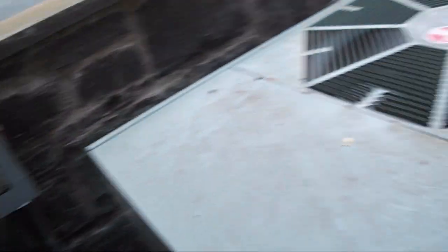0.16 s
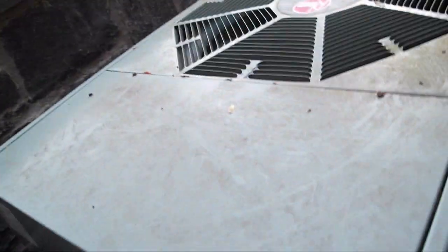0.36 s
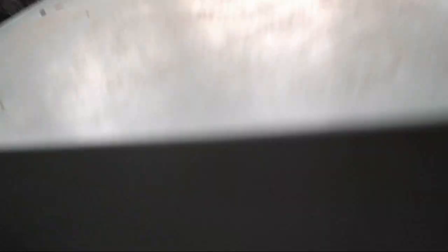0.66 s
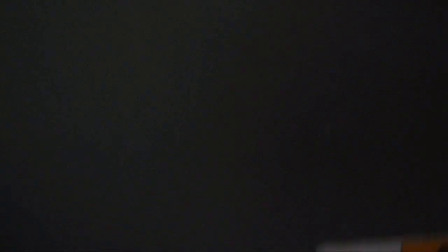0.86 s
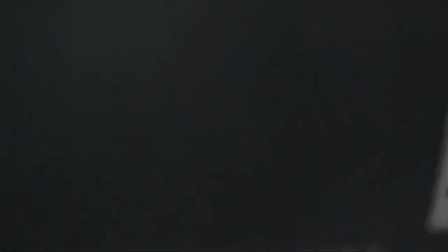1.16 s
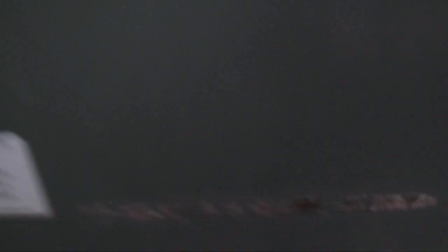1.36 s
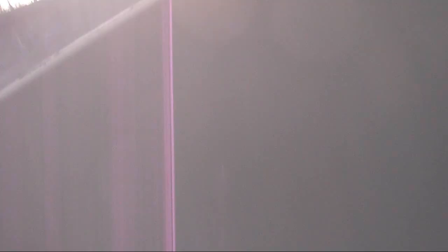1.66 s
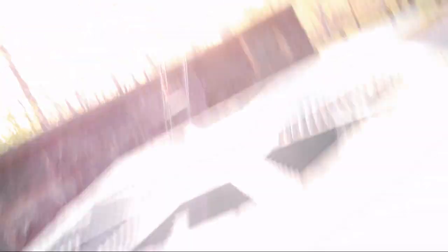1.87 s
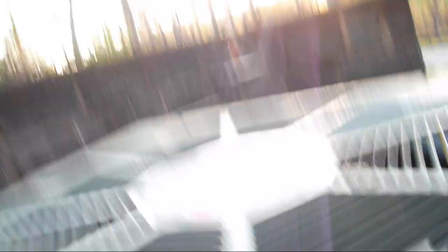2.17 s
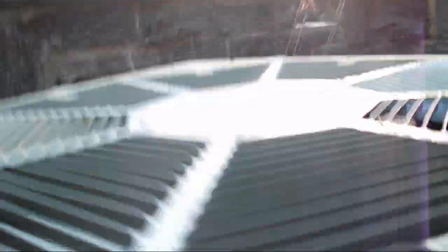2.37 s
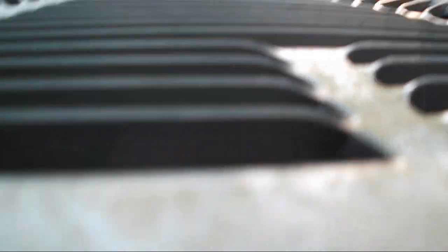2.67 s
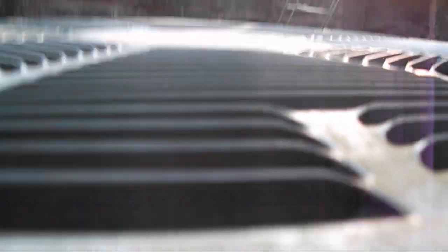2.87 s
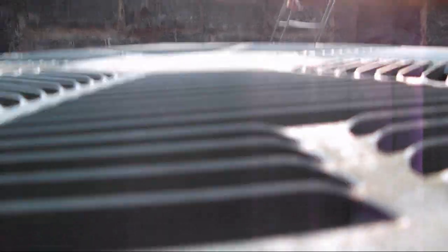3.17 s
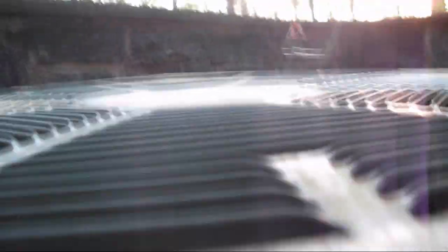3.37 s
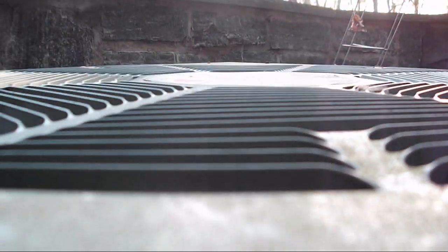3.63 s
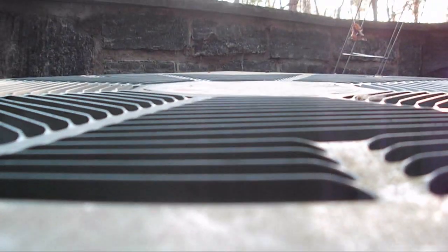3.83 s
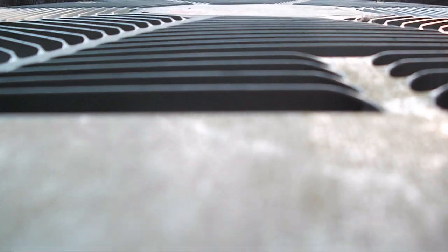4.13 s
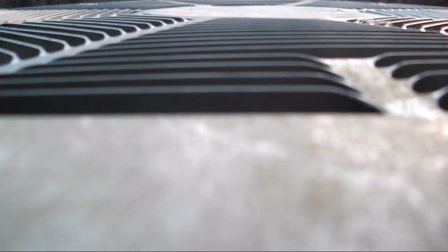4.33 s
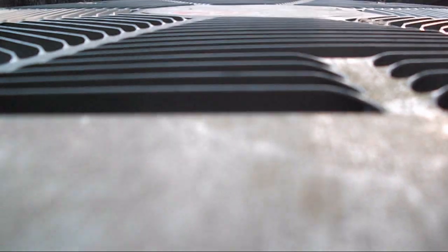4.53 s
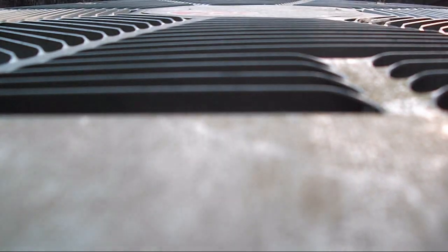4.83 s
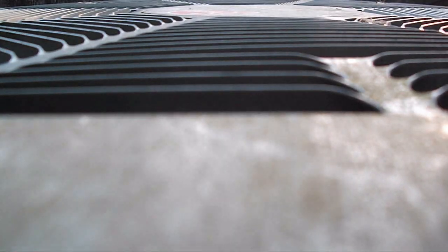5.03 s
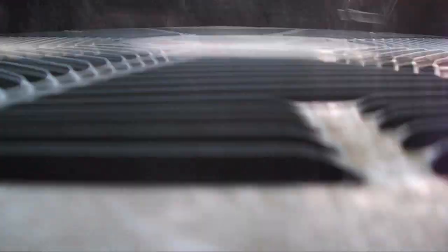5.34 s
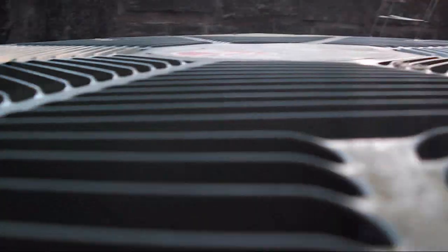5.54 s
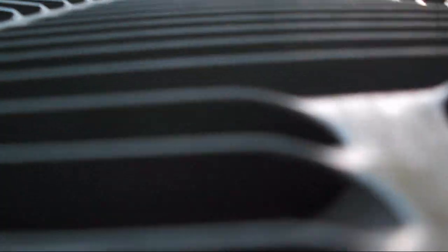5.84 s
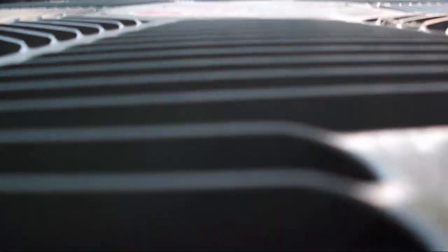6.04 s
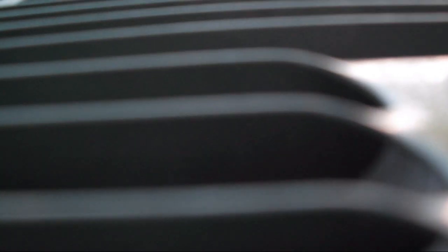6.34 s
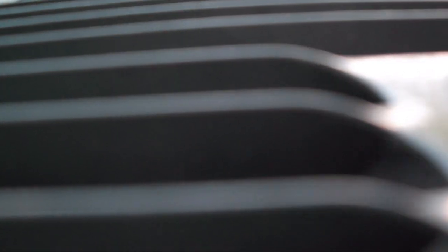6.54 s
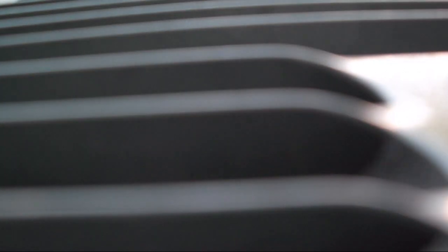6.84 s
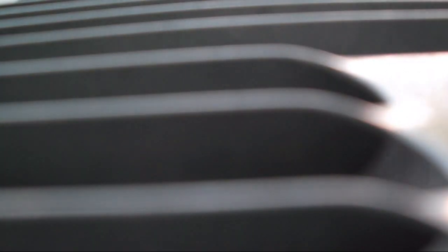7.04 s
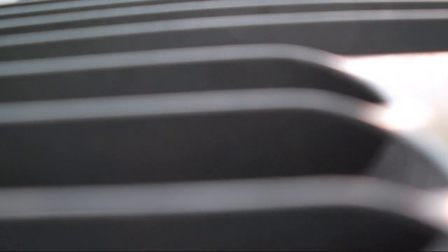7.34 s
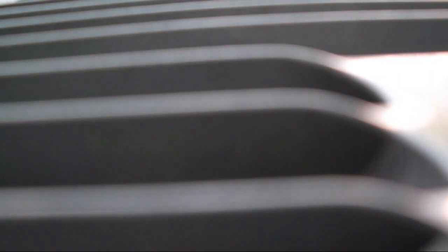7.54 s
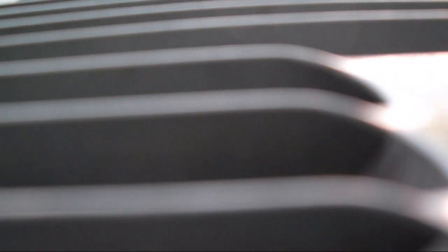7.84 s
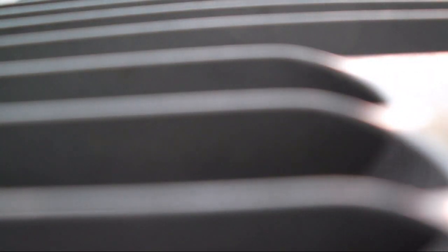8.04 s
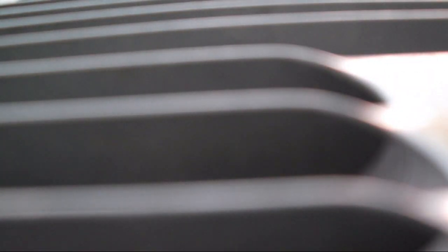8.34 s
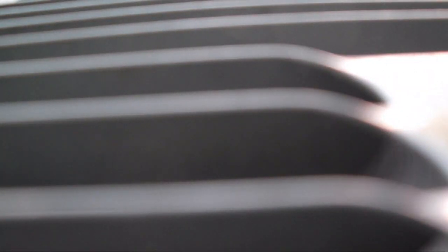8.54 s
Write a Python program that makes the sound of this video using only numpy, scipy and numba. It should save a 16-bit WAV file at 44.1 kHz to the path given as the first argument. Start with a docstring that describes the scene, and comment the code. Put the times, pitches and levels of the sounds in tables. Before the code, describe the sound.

A handheld microphone moves around a running heat pump outdoors. At first there is steady airy hiss and low hum, then a close buzzing panel drone with small dry creaks. Over the fan, a deep rapid throb and wind rumble take over. Sharp plastic-on-metal knocks cluster, a few fainter ones follow, then a scrape and thump, before a long, loud, slightly clipped rumble.

```python
"""An outdoor heat pump runs: a three-bladed fan throbs and drives air through coil and top grille; the compressor
hums and whines. Pulses and air are blade harmonics and coloured noise; hum and whine are shaft harmonics.
A hand-held camera creaks as enveloped noise, passes the cabinet's side and is rested on the lid,
where it knocks as struck ringing modes, scrapes as swelling noise, and catches the draught.
Its stepped gain control ducks just after loud crests, then climbs back in small steps."""
import sys
import numpy as np
from scipy import signal
from scipy.fft import rfft, irfft, next_fast_len
from scipy.io import wavfile
from numba import njit

SR = 44100
rng = np.random.default_rng(int(sys.argv[2]) if len(sys.argv) > 2 else 0)


def file_out(sig):
    """Save sig as 16-bit WAV at sys.argv[1]."""
    # one column per channel
    cols = np.atleast_2d(sig).T
    # limit, then scale
    lim = np.clip(cols, -1, 1)
    pcm = np.round(lim * 32767).astype(np.int16)
    wavfile.write(sys.argv[1], SR, pcm)


N = 383669
TIME = np.arange(N) / SR  # s


def undb(db):
    """Decibels to gain."""
    return 10 ** (np.asarray(db) / 20)


def unit(x):
    """Scale to rms 1."""
    return x / np.sqrt(np.mean(x ** 2))


def curves(table):
    """Each column of a timed table, joined by straight lines."""
    s, *columns = np.transpose(table)
    return [np.interp(TIME, s, column) for column in columns]


def walk(rate_hz):
    """Smooth random wander of rms 1: noise with a Gaussian low-pass, empty above 200 Hz."""
    f = np.fft.rfftfreq(2 ** 19, 1 / SR)
    bins = np.count_nonzero(f < 200)
    spectrum = rng.standard_normal(bins) + 1j * rng.standard_normal(bins)
    wander = irfft(spectrum * np.exp(-(f[:bins] / rate_hz) ** 2))
    wander_time = np.arange(len(wander)) / len(wander) / f[1]
    return unit(np.interp(TIME, wander_time, wander))


def noise(spectrum, rings=()):
    """Noise of rms 1, coloured by an f/Hz, level/dB curve and optional narrow resonances."""
    hz, db = np.transpose(spectrum)
    size = next_fast_len(N)
    f = np.maximum(np.fft.rfftfreq(size, 1 / SR), 1)
    colour_db = np.interp(np.log(f), np.log(hz), db)
    for centre, width, lift in rings:
        colour_db = colour_db + lift / (1 + (2 * (f - centre) / width) ** 2)
    white = rng.standard_normal(size)
    return unit(irfft(rfft(white) * undb(colour_db), size)[:N])


def add(out, s, sound):
    """Mix a sound in at time s."""
    i = int(s * SR)
    out[i:i + len(sound)] += sound[:N - i]


BLADE_HZ, BLADE_COUNT = 42.63, 3
# Blade pulse: multiple of the blade rate, level/dB against the throb; the first row is the throb itself
BLADE_HARMONICS = [(1, 0), (2, -16), (3, -20), (4, -28), (5, -32), (6, -39), (7, -32.5), (8, -32.5)]


def fan(angle, throb_db, unbalance_db=-18, flutter_db=2.0, overtone_flutter_db=3, far_db=-34, skew=0.99):
    """Each blade sweeps a lopsided pressure pulse past the microphone; one blade pushes a little harder."""
    pulse = np.cos(angle) + undb(unbalance_db) * np.cos(angle / BLADE_COUNT)
    for order, db in BLADE_HARMONICS[1:]:
        level = undb(db + overtone_flutter_db * walk(4.7))
        pulse = pulse + level * np.cos(order * angle + skew)  # skew in radians
    near = undb(throb_db + flutter_db * walk(9)) * pulse
    # the third and fifth harmonics also carry all round the cabinet
    carried = np.cos(3 * angle + skew) + np.cos(5 * angle + skew)
    return np.sqrt(2) * (near + undb(far_db) * carried)


# Buffeting outgrows the throb: level at the louvres, dB per dB of nearness, level in the open air
BUFFET_DB, BUFFET_SLOPE, BREEZE_DB = -9, 2.0, -28.5
# The rush levels off inside the fan's jet: level there, nearness at the jet's edge
RUSH_DB, JET_EDGE_DB = -21.5, -14
# The draught hits the microphone squarely: t/s, half length/s, lift/dB
SQUARE_GUSTS = [(3.35, 0.1373, 6), (6.267, 0.27, 3.5)]


def draught(near_db, rush_share=0.71):
    """Levels in dB of buffeting and rush, from the nearness to the fan and the gusts."""
    gust_db = sum(db * np.exp(-((TIME - s) / half_s) ** 2) for s, half_s, db in SQUARE_GUSTS)
    buffet = np.hypot(undb(BUFFET_DB + BUFFET_SLOPE * near_db), undb(BREEZE_DB))
    rush = undb(RUSH_DB) / np.hypot(1, undb(JET_EDGE_DB - near_db))
    buffet_db = 20 * np.log10(buffet) + gust_db
    rush_db = 20 * np.log10(rush) + rush_share * gust_db
    return buffet_db, rush_db


# Colour of air through the coil: f/Hz, relative level/dB per Hz
COIL_COLOUR = [(25, 3.5), (100, -4), (200, -0.5), (380, -8.5), (560, -11), (950, -11.5), (1700, -17),
               (2450, -19), (3300, -31.5), (4200, -34.5), (5400, -32), (7000, -33), (8300, -40.5),
               (11400, -40.5), (13500, -54.5)]
# Narrow resonances in the coil's hiss: f/Hz, width/Hz, lift/dB
COIL_RESONANCES = [(1490, 74, -0.5), (2300, 360, 1), (5190, 100, 5.5), (6300, 120, 3), (7220, 92, -6),
                   (7900, 150, 2.5), (9570, 220, 3.5)]
# Colour of air past the louvres: f/Hz, relative level/dB per Hz
LOUVRE_COLOUR = [(60, -2), (150, -2), (280, -2), (420, -2.5), (560, -0.5), (720, -8), (1050, -10),
                 (1400, -17.5), (2200, -15), (3400, -28.5), (7000, -73), (11500, -76), (15000, -64)]
# Colour of eddies on the microphone: f/Hz, relative level/dB per Hz
EDDY_COLOUR = [(8, -11), (18, 0.5), (35, -0.5), (80, 0.5), (115, -8.5), (170, -11), (300, -28), (700, -36),
               (2000, -99)]


def air(angle, buffet_db, rush_db, coil_db=-24.5, chop_db=1.5, gust_db=1.6, swirl_db=1.1):
    """Steady air hisses through the coil; above the grille, gusty air rushes in wakes, once a blade."""
    wake, gust = np.cos(angle), walk(29)
    coil = noise(COIL_COLOUR, COIL_RESONANCES) * undb(coil_db + .5 * walk(2.2))
    rush = noise(LOUVRE_COLOUR) * undb(rush_db + chop_db * wake + swirl_db * gust)
    buffet = noise(EDDY_COLOUR) * undb(buffet_db + gust_db * gust)
    return coil + rush + buffet


PASS_S = 1.455  # when the microphone is closest to the compressor's side panel


def pass_by(close_db, half_s, far_db):
    """Gain of a part the microphone passes: it falls as 1 / distance down to what is heard all round."""
    distance = np.hypot(1, (TIME - PASS_S) / half_s)
    return np.hypot(undb(close_db) / distance, undb(far_db))


def tones(angle, table, fade_db):
    """Shaft harmonics in random phase; each level wanders slowly, as if crossing standing waves."""
    out = np.zeros(N)
    for order, db in table:
        phase = 2 * np.pi * rng.random()
        out += undb(db + fade_db * walk(0.56)) * np.sin(order * angle + phase)
    return out


COMPRESSOR_HZ, MAINS_HZ, WHINE_ORDER = 58.63, 60, 19
# Tones heard all round the cabinet: multiple of the shaft rate, level/dB
HUM_TONES = [(8, -40), (9, -39), (10, -44), (14, -42.5), (16, -47.5), (18, -43), (21, -50), (24, -49.5),
             (25, -46.5), (26, -48), (32, -51), (37, -53)]
# Tones of the side panel, heard close to it: multiple of the shaft rate, level/dB before the pass-by gain
PANEL_TONES = [(4, -31), (5, -36), (6, -32.5), (7, -42), (11, -41), (12, -46.5), (13, -38), (20, -47),
               (23, -44.5)]
# The whine along the microphone's path: t/s, level/dB against whine_db
WHINE_PATH = [(0, -8.5), (.8, 8.5), (1.0, -2), (1.48, -1), (1.72, 3.5), (2.08, 4.5), (2.55, -6.5), (4.0, 5),
              (4.7, -8), (6, 0), (8.7, -13)]


def compressor(whine_db=-37, mains_db=-41, waver_hz=0.0275):
    """Shaft drone, ringing side panel, hum, one strong whine and the motor's tone at twice the mains rate."""
    path_db, = curves(WHINE_PATH)
    angle = 2 * np.pi * np.cumsum(COMPRESSOR_HZ + waver_hz * walk(2.8)) / SR
    drone = pass_by(close_db=-12.0, half_s=0.088, far_db=-32) * np.sin(angle)
    panel = pass_by(close_db=3.0, half_s=0.36, far_db=-10.5) * tones(angle, PANEL_TONES, fade_db=1.0)
    hum = tones(angle, HUM_TONES, fade_db=3)
    whine = undb(whine_db + path_db) * np.sin(WHINE_ORDER * angle)
    mains = undb(mains_db) * np.sin(2 * np.pi * 2 * MAINS_HZ * TIME)
    return np.sqrt(2) * (drone + panel + hum + whine + mains)


# Colour of the casing's thin creak: f/Hz, relative level/dB per Hz
CREAK_COLOUR = [(300, -16), (1400, -4.5), (1650, 7.5), (2400, -1), (3500, -9.5), (4200, -16.5), (7000, -22),
                (10500, -25.5), (15000, -40)]
# The casing creaks in the hand: t/s, rms level at the crest/dB, rise time/s
CREAK_TIMES = [(1.0875, -15, .0045), (1.267, -26, .002), (2.077, -16, .0018), (2.24, -16, .0018),
               (2.66, -18, .0015), (6.343, -17, .0015), (6.369, -18, .002)]


def creaks():
    """Short dry slips of the casing's seams under the fingers; each swells fast and dies away."""
    slip, t = np.zeros(N), TIME[:SR // 10]
    for s, db, rise_s in CREAK_TIMES:
        add(slip, s, undb(db) * t / rise_s * np.exp(1 - t / rise_s))
    return slip * noise(CREAK_COLOUR)


# Ringing of lid and camera casing: f/Hz, relative level/dB, t60/s
LID_MODES = [(247, -12, 0.018), (414, -3.5, 0.016), (586, -7, 0.019), (800, 2, 0.012), (1200, -2.5, 0.0079),
             (1710, -1.5, 0.013), (2760, -10.5, 0.02), (3600, -16, 0.0089), (6010, -19, 0.0041)]
# Colour of a blow's dull crack: f/Hz, relative level/dB per Hz
CRACK_COLOUR = [(100, 2.5), (500, 4), (1300, -5.5), (1900, -5.5), (3200, -10), (4500, -31.5), (8000, -52),
                (15000, -51)]
# The casing knocks on the lid: t/s, peak level/dB, brightness/dB per octave, chatter time/s
KNOCK_TIMES = [(2.892, 11, 1.5, 0.0041), (3.412, 6.5, 1, .002), (3.4323, 20, 4, .003),
               (3.4561, 21.5, 5, 0.0025), (3.488, 26, 2, 0.0026), (3.517, 19, 0, .0022),
               (3.534, 16.5, 3, .001), (3.6001, 13, -3, 0.0022), (3.7018, 11, -4.5, 0.002),
               (4.4497, 5, 0, 0.0046), (4.6338, 6, -0.5, 0.0043), (5.4124, 2, 4, .0015),
               (5.4709, 22.5, 4.5, 0.0023), (5.4912, 14, -2, .0006), (5.835, 10.5, -1, 0.0048)]


def knocks(chatter=0.245, scatter_db=1, crack_db=-2):
    """A blow and a brief chatter of the contact ring the lid and the casing, under a broad crack."""
    out, t = np.zeros(N), TIME[:SR // 10]
    hz, db, t60 = np.transpose(LID_MODES)[:, :, None]
    crack = noise(CRACK_COLOUR)
    for s, peak_db, bright, chatter_s in KNOCK_TIMES + rattle():
        size, detune = rng.standard_normal((2, len(LID_MODES), 1))
        gain = undb(db + bright * np.log2(hz / 1500) + scatter_db * size)
        decay = np.exp(-np.log(1000) * t / t60)
        tone = np.sin(2 * np.pi * hz * (1 + 0.046 * detune) * t)
        ring = np.sum(gain * decay * tone, axis=0)
        contact = np.exp(-t / chatter_s)
        force = chatter * rng.standard_normal(len(t)) * contact
        force[0] += 1  # the blow itself
        rung = signal.fftconvolve(force, ring)[:len(t)]
        snap = undb(crack_db + bright) * contact * crack[int(s * SR):][:len(t)]
        blow = rung / np.abs(rung).max() + snap
        add(out, s, undb(peak_db) * blow / np.abs(blow).max())
    return out


# Colour of the casing sliding on paint: f/Hz, relative level/dB per Hz
SCRAPE_COLOUR = [(150, 14.5), (280, 12.5), (550, 11.5), (1200, 1), (2500, 5.5), (3800, -0.5), (4900, -5),
                 (7500, -4), (10000, -18.5), (13000, -20), (15500, -27)]
# Hollows of the camera casing that colour a scrape: f/Hz, width/Hz, lift/dB
CASING_HOLLOWS = [(1700, 440, 6), (2100, 200, -5.5), (4550, 460, -7)]
# The casing slides on the lid: start t/s, end t/s, final level/dB, swell on the way/dB (negative fades)
SLIDE_TIMES = [(3.425, 3.485, -4.5, 10), (5.347, 5.462, -8.5, 9), (5.473, 5.775, -17, -3.5),
               (5.832, 5.918, -20, -3)]
# The casing settles with a push of air: t/s, f/Hz, decay/s, level/dB
AIR_PUSH = (5.471, 9.6, .09, 6.8)


def slides(grit_db=3.5):
    """Plastic scrapes gritty over painted metal as pressure changes; one jolt is a slow, decaying swing."""
    pressure = np.zeros(N)
    for start, end, db, swell_db in SLIDE_TIMES:
        size = max(int((end - start) * SR), 2)
        swell = undb(db + np.linspace(-swell_db, 0, size))
        add(pressure, start, swell * signal.windows.tukey(size, .15))
    grit = undb(grit_db * walk(250))
    out = pressure * unit(noise(SCRAPE_COLOUR, CASING_HOLLOWS) * grit)
    s, hz, decay_s, db = AIR_PUSH
    t = TIME[:SR // 2]
    onset = 1 - np.exp(-t / 0.0026)
    add(out, s, undb(db) * np.exp(-t / decay_s) * np.cos(2 * np.pi * hz * t) * onset)
    return out


# The casing comes to rest: start t/s, end t/s, peak level/dB, brightness/dB per octave, chatter time/s
RATTLE_SPAN = (3.497, 3.552, 10.6, 5.5, 0.0013)


def rattle(count=4):
    """Light, bright taps at uneven intervals, rung by knocks() as further blows."""
    start, end, db, bright, chatter_s = RATTLE_SPAN
    step = (end - start) / count
    return [(start + step * (k + rng.random()), db, bright, chatter_s) for k in range(count)]


# The microphone comes from beside the cabinet onto the lid, then up to the louvres:
# t/s, nearness to the fan as throb level/dB
NEARNESS = [(0, -25), (1.6, -26), (2.0, -17.5), (2.35, -7.5), (3.3, -6), (3.7, -7.5), (4.8, -9), (5.6, -7),
            (6.05, -1.5), (8.7, -1)]


def scene():
    """Machine, draught and handling at the microphone."""
    near_db, = curves(NEARNESS)
    buffet_db, rush_db = draught(near_db)
    angle = 2 * np.pi * np.cumsum(BLADE_HZ + .05 * walk(1.0)) / SR
    machine = fan(angle, near_db) + air(angle, buffet_db, rush_db) + compressor()
    handling = creaks() + knocks() + slides()
    return (machine + handling)[None]


@njit
def stepped_gain(x, limit, down, up, lag, rest, wait):
    """Gain drops a step just after a crest passes the limit, and climbs back a step after each quiet wait."""
    y, gain, due, since = np.empty(len(x)), 1., -1, 0
    for i in range(len(x)):
        y[i] = gain * x[i]
        since += 1  # samples since the last step
        if abs(y[i]) > limit and due < i and since > rest * SR:
            due = i + int(lag * SR)
        if i == due:
            gain, since = gain * down, 0
        elif since > wait * SR:
            gain, since = min(gain * up, 1.), 0
    return y


TOP_HZ = 15800


def record(dry):
    """Stepped gain control, hard clipping of what still overloads, and a steep cut of the top."""
    # lag, rest and wait in seconds
    held = stepped_gain(dry[0], limit=.73, down=undb(-2.5), up=undb(1.25), lag=.0006, rest=.005, wait=.032)
    top_cut = signal.ellip(8, .2, 70, TOP_HZ, fs=SR, output="sos")
    return signal.sosfilt(top_cut, np.clip(held, -1, 1))[None]


dry = scene()
out = record(dry)
file_out(out)
```